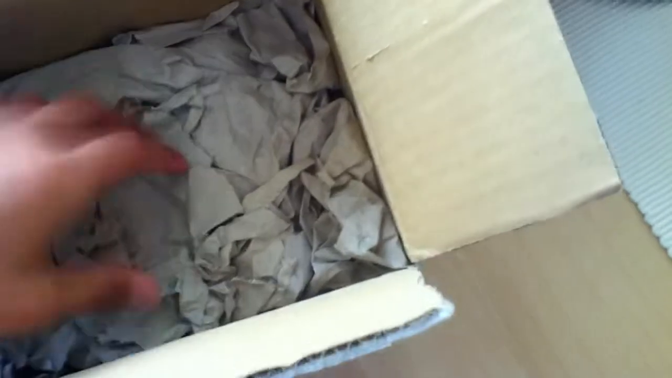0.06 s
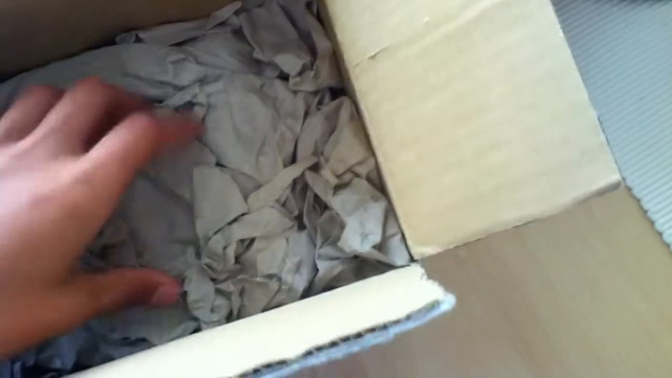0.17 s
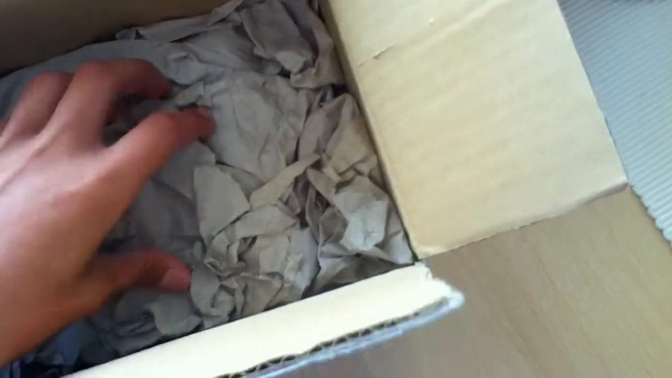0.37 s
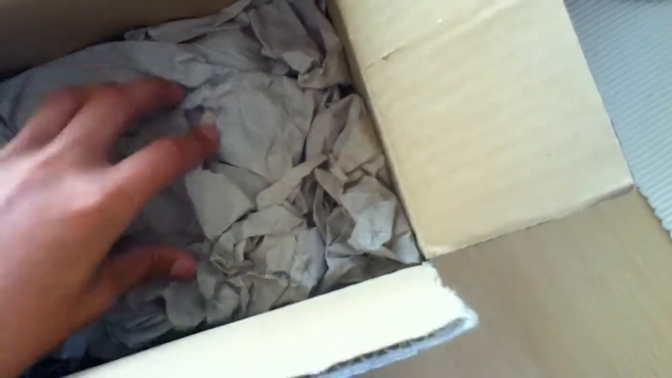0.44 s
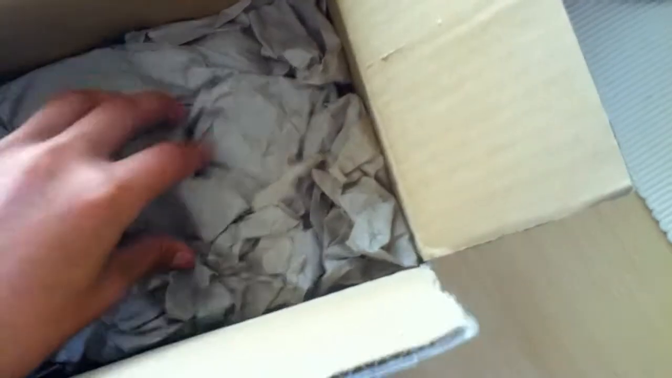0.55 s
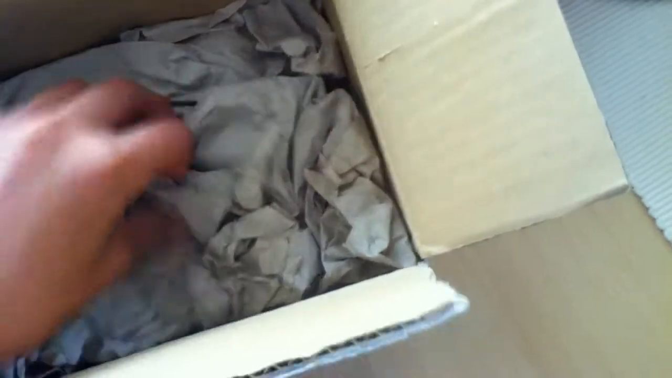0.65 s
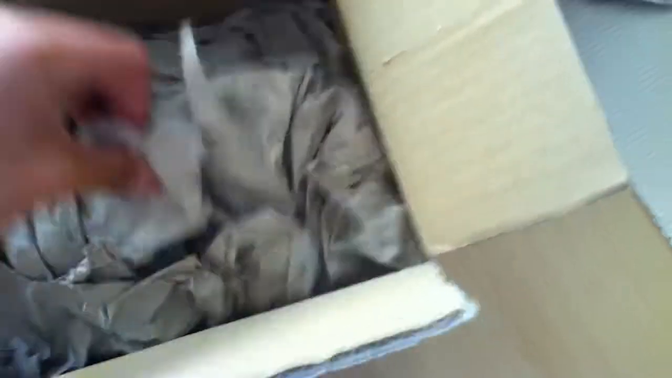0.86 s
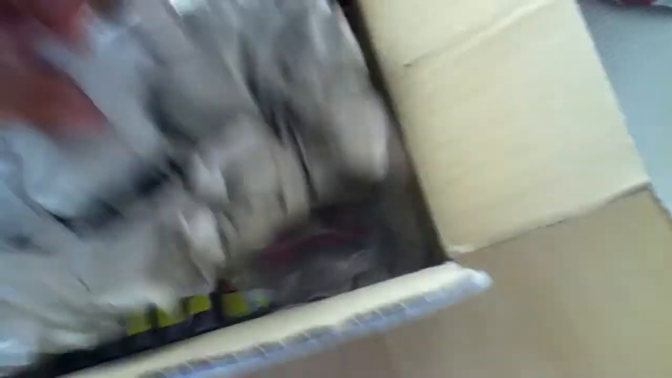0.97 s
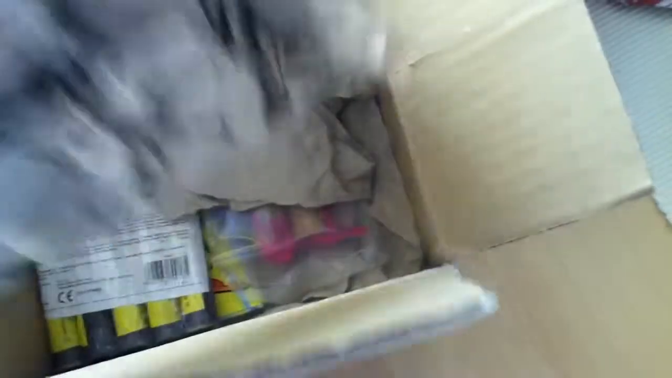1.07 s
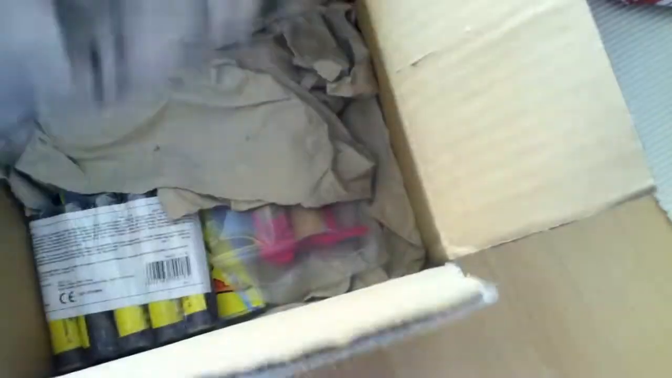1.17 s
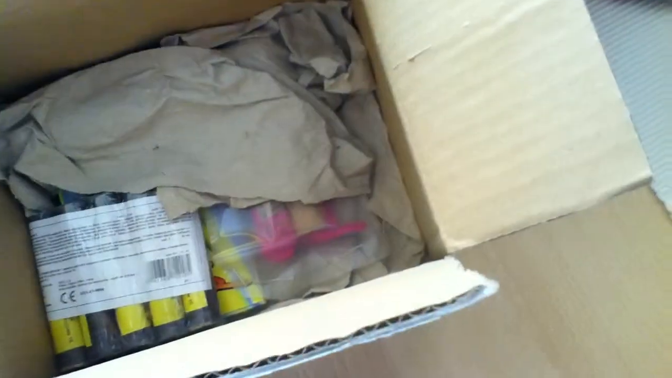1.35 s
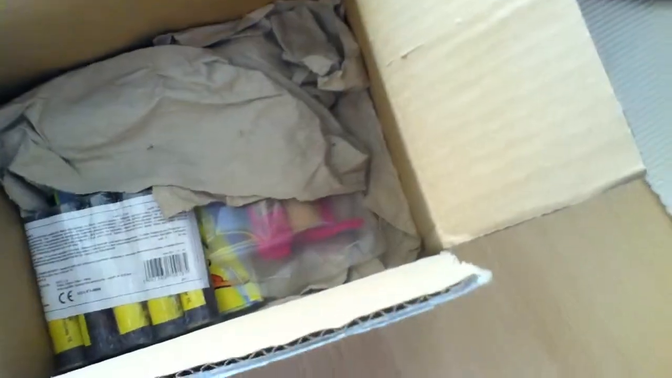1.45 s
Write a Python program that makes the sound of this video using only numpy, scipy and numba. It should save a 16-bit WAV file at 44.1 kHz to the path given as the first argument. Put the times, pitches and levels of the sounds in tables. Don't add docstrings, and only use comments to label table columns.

```python
import sys
import numpy as np
from scipy import signal
from scipy.fft import rfft, irfft
from scipy.io import wavfile
from scipy.ndimage import uniform_filter1d
from numba import njit

SR = 44100
rng = np.random.default_rng(int(sys.argv[2]) if len(sys.argv) > 2 else 0)


def to_wav(sig):
    pcm = np.clip(np.atleast_2d(sig), -1, 1) * 32767
    pcm = np.round(pcm).astype(np.int16)
    wavfile.write(sys.argv[1], SR, pcm.T)


def gain_from_db(level_db):
    decades = np.asarray(level_db, float) / 20
    return 10 ** decades


N = 66150

# t/s, level/dB
PRESSURE = [(0, -41.5), (.16, -55), (.2, -55.5), (0.301, -45.5), (.42, -50.5), (.63, -48), (.66, -44.5),
            (.75, -44.5), (.86, -51.5), (.95, -43.5), (1.0, -46.5), (1.12, -57), (1.25, -89)]


def level(x):
    return x / np.sqrt(np.mean(x ** 2))


def table_db(table, hz):
    table_hz, db = np.transpose(table)
    return np.interp(np.log(np.maximum(hz, 1)), np.log(table_hz), db)


def colour(x, table):
    hz = np.arange(N // 2 + 1) * SR / N
    return irfft(rfft(x) * gain_from_db(table_db(table, hz)), N)


def ring(x, hz, width):
    b, a = signal.iirpeak(hz, hz / width, fs=SR)
    return signal.lfilter(b, a, x)


def walk(rate):
    hold = int(SR / rate)
    steps = np.repeat(rng.standard_normal(N // 40), hold)[:N]
    return level(uniform_filter1d(steps, hold))


@njit
def grains(n, start, turn, cycles, size, sag):
    out = np.zeros(n)
    for g in range(len(start)):
        w, a, phase, i = turn[g], size[g], 0., start[g]
        while a > size[g] / 300 and i < n:
            out[i] += a * np.sin(phase)
            phase += w
            a *= 1 - w / (2 * np.pi * cycles[g])
            w *= 1 - sag * w / (2 * np.pi)
            i += 1
    return out


def effort():
    # t/s, level at start/dB, level at end/dB, brightness/dB
    strokes = [(0, -46.5, -52.5, -3.5), (0.056, -45.5, -44.5, -2.5), (0.099, -52, -51, -2),
               (0.129, -37.5, -38.5, -4), (0.169, -46.5, -57, -0.5), (.206, -50, -51, 1),
               (.22, -63, -42, 3), (0.234, -37, -37.5, 3), (.312, -46, -35, -1), (0.353, -41, -27.5, -3),
               (0.3718, -45.5, -42, 2), (0.433, -38.5, -37, 0.1), (0.493, -40.5, -43, 0.5),
               (0.542, -35.5, -37, 0.8), (.585, -34.5, -34.5, 2), (.608, -36, -36.5, 1.5),
               (.634, -30.5, -33, -1), (0.644, -28, -27, -1.5), (0.659, -29.5, -31, -3.5),
               (.685, -24, -28, 4), (0.694, -29, -30, 0), (0.739, -31, -27, -2), (0.759, -23, -20, 2.5),
               (0.775, -23, -34, -0.9), (0.8, -36, -35.5, -0.3), (.874, -36, -30, -0.5),
               (0.889, -30, -29.5, -1.5), (.9015, -27.5, -35, -1.5), (0.914, -33.5, -29.5, -5),
               (0.949, -26.5, -24.5, -1.5), (0.991, -28, -35.5, 2), (1.058, -35.5, -39, -1),
               (1.115, -45.5, -52.5, -3), (1.159, -46.5, -52, 0.3), (1.212, -57.5, -70.5, 4.5),
               (1.276, -59.5, -52, -1), (1.308, -62.5, -73, -6), (1.415, -57.5, -59.5, -1)]
    edge_s = 0.0045
    start, db_from, db_to, bright_db = np.transpose(strokes)
    t = np.arange(N) / SR
    k = np.searchsorted(start, t, side="right").clip(1) - 1
    lasting = np.diff(np.append(start, N / SR))
    along = (t - start[k]) / lasting[k]
    db = db_from[k] + along * (db_to[k] - db_from[k])
    edge = int(edge_s * SR) + 1
    return uniform_filter1d(gain_from_db(db), edge), uniform_filter1d(gain_from_db(bright_db[k]), edge)


def crease_clicks():
    per_s, cycles, scatter_db, cap_db = 3500, 2.38, 4, 8
    wait, pitch, life, size = rng.random((9000, 4)).T
    t = np.cumsum(-np.log(wait) / per_s)
    inside = t < N / SR
    at = (t[inside] * SR).astype(np.int64)
    hz = 500 * 30 ** pitch[inside]
    db = np.minimum(-scatter_db * np.log(size[inside]), cap_db)
    return grains(N, at, 2 * np.pi * hz / SR, cycles * (0.5 + life[inside]), gain_from_db(db) * hz, 0.024)


def sliding():
    flicker_db, hiss = 3, np.zeros(N)
    for hz in 600 * 2 ** np.arange(0, 5, 0.66):
        band = ring(rng.standard_normal(N), hz, hz * 0.8)
        hiss += band * np.sqrt(hz) * gain_from_db(flicker_db * walk(91.2))
    return colour(hiss, [(300, -4.5), (16000, -7.5)])


def rustle():
    # f/Hz, level/dB per Hz
    paper_spectrum = [(290, -3), (500, -2.5), (1130, -6.5), (1250, -6.5), (2260, -0.5), (2460, -4),
                      (6060, -4), (12300, -9.5), (16000, -21.5)]
    slide_db, bright_hz = 1.5, 5500
    mixed = level(crease_clicks()) + gain_from_db(slide_db) * level(sliding())
    sheet = level(colour(mixed, paper_spectrum))
    gain, bright = effort()
    low_pass = signal.butter(1, bright_hz, fs=SR, output="sos")
    dull = signal.sosfiltfilt(low_pass, sheet)
    return gain * (dull / bright + (sheet - dull) * bright)


def room_hush():
    # f/Hz, level/dB per Hz
    room_spectrum = [(15, -48.5), (25, -27), (87, -3), (212, -4.5), (624, -11), (887, -20.5), (3080, -20),
                     (8830, -22.5), (16000, -27.5)]
    hush_db, sway_db = -57, 1.8
    hush = level(colour(rng.standard_normal(N), room_spectrum))
    return hush * gain_from_db(hush_db + sway_db * walk(14.8))


def cavity(x):
    # f/Hz, width/Hz, level/dB
    cavity_modes = [(274, 46, -8.5), (341, 72, -7), (480, 200, -14), (780, 120, -14.5)]
    return sum(gain_from_db(db) * ring(x, hz, width) for hz, width, db in cavity_modes)


def box_rub():
    flicker_db = 2.5
    friction = rng.standard_normal(N) * gain_from_db(flicker_db * walk(40.03))
    t, db = np.transpose(PRESSURE)
    return level(cavity(friction)) * gain_from_db(np.interp(np.arange(N) / SR, t, db, right=-90))


def wall_boom():
    wall_hz, width_hz, wall_db = 94.5, 22, -17.5
    wall = ring(rng.standard_normal(N), wall_hz, width_hz)
    wall = ring(wall, wall_hz, width_hz * 2)
    t, db = np.transpose(PRESSURE)
    load = np.interp(np.arange(N) / SR, t, db, right=-58)
    return level(wall) * gain_from_db(wall_db + uniform_filter1d(load, size=4000))


def thuds():
    # t/s, level/dB, f/Hz
    blows = [(0.0046, -53, 393), (.152, -36, 350), (.233, -33.5, 710), (.238, -21.5, 2030),
             (.298, -37, 600), (.37, -40, 280), (.472, -36, 355), (.535, -32.5, 376), (.552, -34, 342),
             (.588, -30.5, 346), (.615, -31, 740), (.645, -27, 334), (.648, -26, 486), (.662, -24.5, 527),
             (.664, -26.5, 927), (.70, -28, 595), (.758, -29.5, 390), (.762, -31.5, 620), (.134, -44, 697),
             (.925, -35, 527), (1.366, -47, 3200), (.9265, -12, 4900), (0.9259, -8, 1780),
             (0.235, -41.5, 307), (0.039, -44, 390), (.959, -31, 1100), (1.088, -32, 1136),
             (0.99, -40, 900), (.981, -18, 1790)]
    rise_cycles, fall_cycles = 2.1, 3.04
    t, out = np.arange(N) / SR, np.zeros(N)
    for s, db, hz in blows:
        turns = np.maximum(t - s, 0) * hz
        swell = (1 - np.exp(-turns / rise_cycles)) * np.exp(-turns / fall_cycles)
        out += gain_from_db(db + 6.5) * swell * np.sin(2 * np.pi * turns)
    return out


def fold_rings(hz, ms):
    spread_oct, side_db, under_db, cycles, sag = 1.7, -5, 1.5, 3.0, 0.015
    jitter, delay, sign, strength = rng.random((4, 15))
    step = (np.arange(15) + jitter) / 7.5 - 1
    octs = spread_oct * step * np.sqrt(np.abs(step))
    f = np.clip(hz * 2 ** octs, 300, 13500)
    late_s = delay ** 3 * ms / 1500
    db = side_db * np.abs(octs) + under_db * np.maximum(-octs, 0)
    size = (0.73 + 0.5 * strength) * gain_from_db(db) * np.sign(sign - 0.5)
    life = cycles * (0.33 + 1.55 * strength) * f / 3000 * ms / 3.5
    return grains(900, (late_s * SR).astype(np.int64), 2 * np.pi * f / SR, life, size, sag)


def snaps():
    # t/s, peak level/dB, f/Hz, length/ms
    folds = [(0.056, -41, 2290, 2), (0.1296, -14, 5000, 1.6), (0.1657, -24, 3600, 1.4),
             (0.2085, -36, 2900, 2), (0.2385, -16.5, 4400, 2), (.29, -23, 3900, 1.4), (0.304, -23, 4300, 4),
             (.3487, -20, 3600, 1.2), (.3488, -20, 12200, 1.1), (.356, -26, 8500, 1),
             (0.3691, -15, 1054, 1.2), (.3694, -14, 3600, 0.9), (.3693, -24, 11500, 1),
             (.5544, -20, 3900, 2.2), (0.5863, -19.5, 6500, 2), (.5932, -19.5, 5700, 1.5),
             (.5993, -21, 6800, 1.5), (.6055, -20.5, 5000, 1.5), (0.6181, -14.5, 5500, 2.5),
             (.6473, -14, 2000, 1), (0.6506, -13, 6800, 2.8), (.656, -19, 5500, 2),
             (0.6657, -14, 3500, 2.4), (0.6853, -11, 2400, 2), (.688, -17, 6500, 3.5),
             (0.709, -13.5, 3400, 1.5), (0.7191, -15, 4000, 1.5), (0.7229, -15, 3700, 1.5),
             (0.7621, -9.5, 5700, 2.5), (.7654, -12.5, 5400, 2), (.7711, -14, 7500, 1.5),
             (0.7727, -4.5, 5700, 1.6), (.8326, -22, 6500, 2), (.8382, -18.5, 4300, 1.36),
             (.8501, -19, 5000, 1.5), (.8885, -18, 6000, 2), (.9025, -17, 4500, 3), (0.9264, -9, 2200, 2.1),
             (.9593, -8, 2800, 1.5), (0.9802, -4.5, 2600, 1.1), (1.002, -19, 7500, 4),
             (1.025, -21, 2700, 4), (1.049, -21, 3000, 3), (1.1114, -27, 2300, 2), (1.1484, -29, 3700, 1.4),
             (1.205, -37, 2900, 2), (1.4275, -47, 3800, 1.5), (1.4799, -37, 4900, 1.3)]
    crack_db, tick_db, tick_ms, ceiling_hz = -4, 1, 0.08, 10500
    out, n = np.zeros(N), np.arange(900)
    for s, db, hz, ms in folds:
        run = fold_rings(hz, ms)
        burst = rng.standard_normal(900) * np.exp(-n / (ms * SR / 1300))
        crack = ring(burst, min(hz * 1.13, 9000), hz * 3.4)
        snap = run / np.abs(run).max() + gain_from_db(crack_db) * crack / np.abs(crack).max()
        tick = np.cos(2 * np.pi * hz * n / SR) * np.exp(-n / (tick_ms * SR / 1000))
        snap += gain_from_db(tick_db) * tick / np.abs(tick).max()
        top_hz = min(hz * 2.5, max(ceiling_hz, hz * 1.3))
        band = signal.butter(3, [hz / 5.8, top_hz], "band", fs=SR, output="sos")
        snap = signal.sosfilt(band, snap)
        i = int(s * SR)
        out[i:i + 900] += (snap * gain_from_db(db) / np.abs(snap).max())[:N - i]
    return out


def bumps():
    # t/s, level/dB
    knocks = [(0.072, -63), (0.161, -51.5), (0.235, -58.5), (0.591, -53), (0.655, -56), (0.771, -38.5),
              (.84, -56), (0.898, -49.5), (0.964, -56), (1.111, -53.5), (1.26, -63)]
    # f/Hz, level/dB, t60/s
    panel_modes = [(66, -26, .1), (104.4, 8.5, 0.13), (130, 5.5, 0.18)]
    t, out = np.arange(N) / SR, np.zeros(N)
    for s, db in knocks:
        u = np.maximum(t - s, 0)
        for hz, mode_db, t60 in panel_modes:
            detuned = hz * (1 + 0.045 * (rng.random() - 0.5))
            envelope = (1 - np.exp(-u / 0.0014)) * 1000 ** (-u / t60)
            out += gain_from_db(db + mode_db) * envelope * np.sin(2 * np.pi * detuned * u)
    return out


def room_echo(near):
    echo_db, t60_s, width_hz = -19.5, 0.41, 5030
    u = np.arange(SR // 2) / SR
    tail = ring(rng.standard_normal(len(u)), 2000, width_hz) * 1000 ** (-u / t60_s) * (u > 0.004)
    return gain_from_db(echo_db) * signal.fftconvolve(near, tail / np.sqrt(np.sum(tail ** 2)))[:N]


def scene():
    hits = snaps()
    box = box_rub() + wall_boom() + bumps() + gain_from_db(-26) * cavity(hits)
    near = rustle() + box + thuds() + hits
    return (near + room_echo(near) + room_hush())[None]


def band_limit(x):
    return signal.sosfilt(signal.butter(12, 16390, fs=SR, output="sos"), x)


def record(dry):
    low_cut = signal.butter(2, 54.5, "high", fs=SR, output="sos")
    top_cut = signal.ellip(10, 0.3, 80, 16150, fs=SR, output="sos")
    heard = signal.sosfilt(top_cut, signal.sosfilt(low_cut, dry))
    return band_limit(heard)


dry = scene()
out = record(dry)
to_wav(out)
```